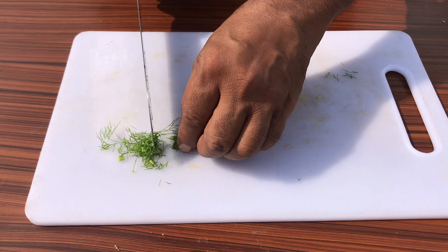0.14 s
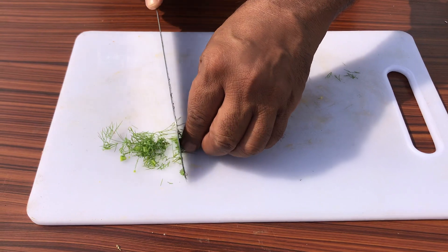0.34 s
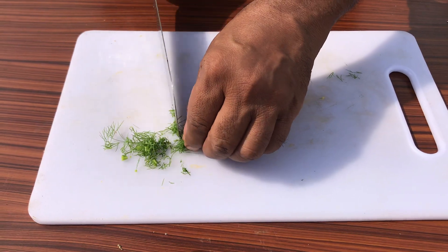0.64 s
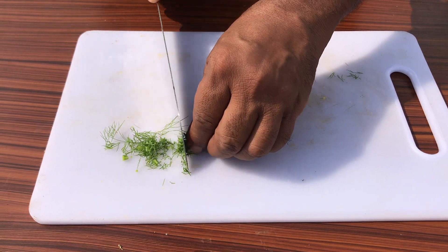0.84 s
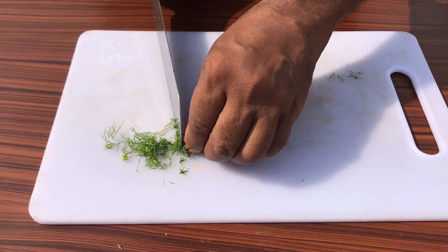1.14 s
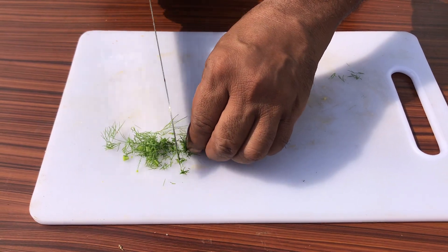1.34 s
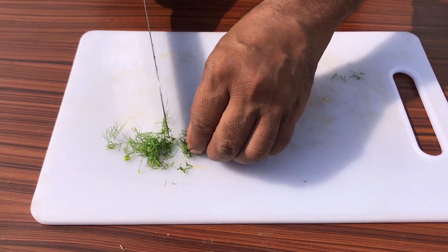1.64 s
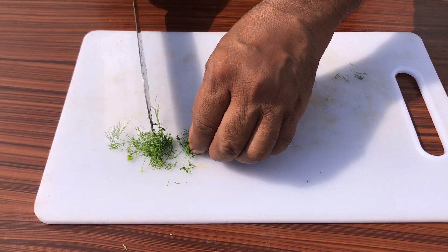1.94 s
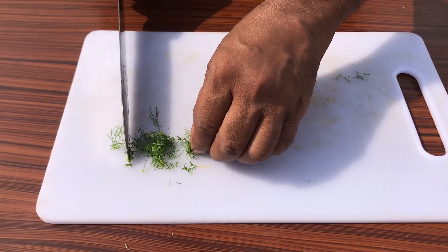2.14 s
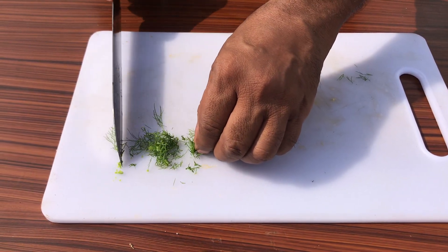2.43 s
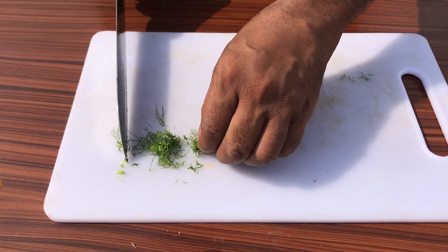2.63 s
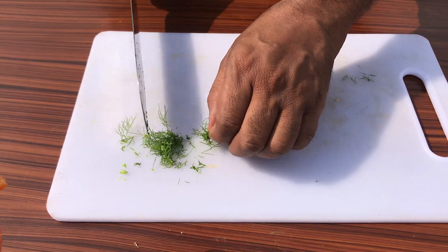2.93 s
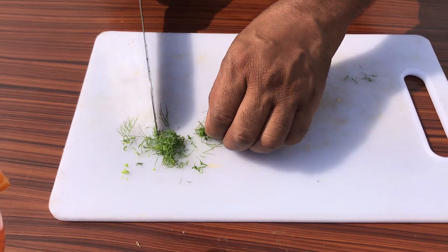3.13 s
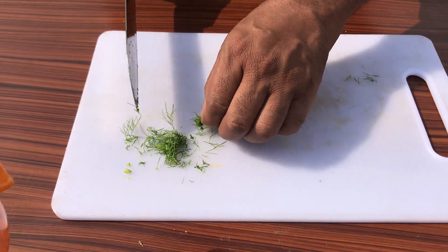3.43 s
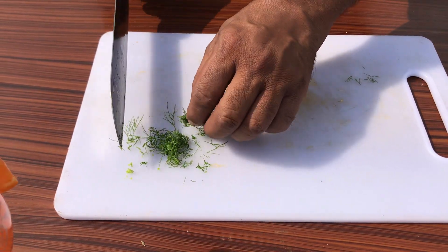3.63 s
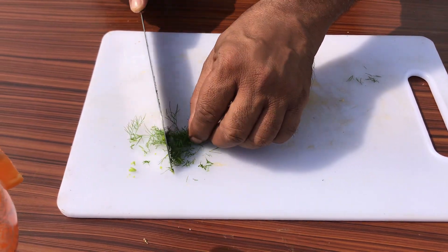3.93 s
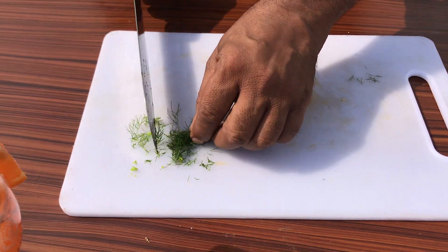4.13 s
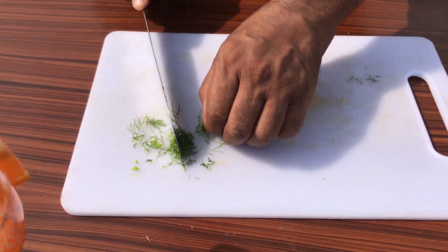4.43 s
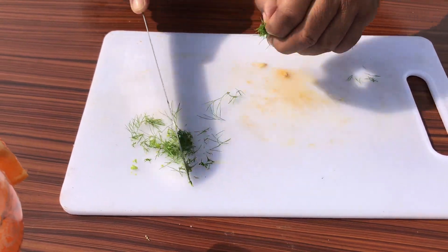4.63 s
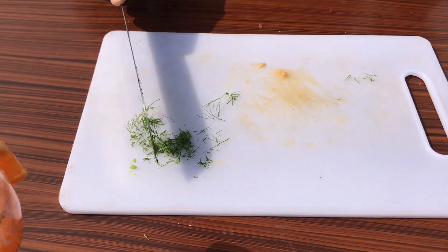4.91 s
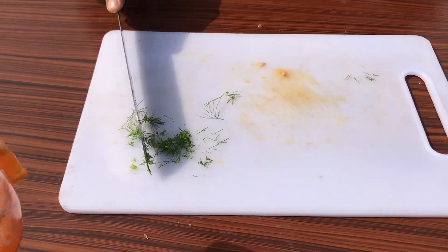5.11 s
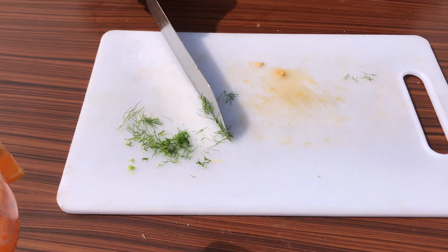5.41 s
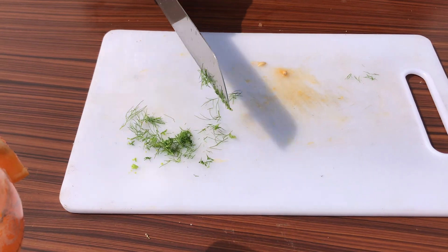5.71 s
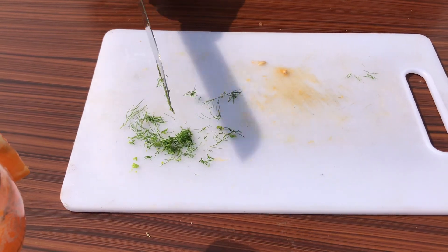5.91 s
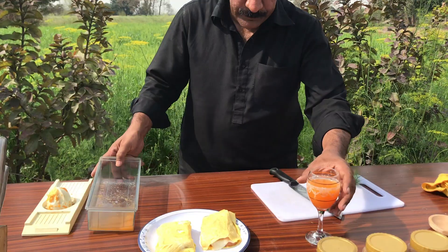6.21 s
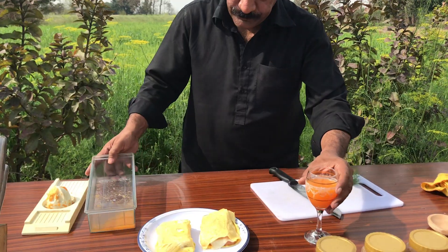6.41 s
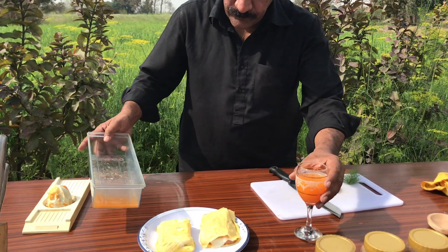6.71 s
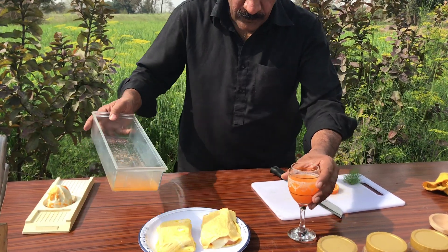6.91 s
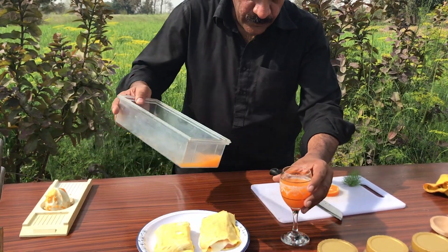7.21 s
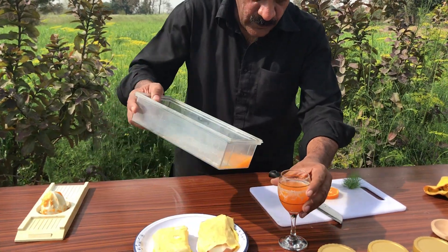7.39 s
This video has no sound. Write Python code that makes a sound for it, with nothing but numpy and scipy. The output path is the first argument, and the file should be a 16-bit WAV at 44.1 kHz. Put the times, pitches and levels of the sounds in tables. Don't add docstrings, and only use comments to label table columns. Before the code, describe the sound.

Close to a phone microphone outdoors, a blade crunches and snaps through herb stems, then lands in sharp irregular cracks on a plastic board, each with a short ring and a woody table thump. Low wind buffets the microphone over rustling crops, a faint far engine and chirping small birds. Near six seconds everything cuts to total silence; quieter open air returns, with thin distant whistles and a double knock of a hollow plastic tub.

```python
import sys
import numpy as np
from scipy import signal
from scipy.fft import rfft, irfft
from scipy.io import wavfile
from scipy.ndimage import uniform_filter1d

SR = 44100
rng = np.random.default_rng(int(sys.argv[2]) if len(sys.argv) > 2 else 0)


def how_loud(loudness_db):
    steps = np.asarray(loudness_db, float) / 20
    return 10 ** steps


def pcm_store(signal):
    levels = np.round(np.clip(np.atleast_2d(signal), -1, 1) * 32767)
    wavfile.write(sys.argv[1], SR, levels.astype(np.int16).T)


N = 332955
T = np.arange(N) / SR

GAP_S, FADE_IN_S = (6.133, 6.806), 0.025
FADE_OUT_S, FADE_OUT_DB = 0.13, -7.5
ONSET_S = 0.001

# [f/Hz, level/dB per Hz]
NEAR_RUSTLE = [(120, -30), (200, 0), (1150, -5), (1490, -1), (2200, -7), (7570, -13), (15600, -19),
               (16900, -47)]
# [f/Hz, level/dB per Hz]
OPEN_AIR = [(76, -33), (130, -8.5), (221, -5), (400, -8), (611, -11), (1600, -9), (11900, -28.5),
            (15600, -27), (16900, -50)]
NEAR_DB, FAR_DB = -64.5, -67
# [f/Hz, level/dB]
MIC_HISS = [(130, -3.5), (500, -4), (2000, -7), (5000, -11.5), (9000, -17.5), (16000, -19.5)]
# [f/Hz, width/Hz, level/dB]
MIC_NOTCH = [(10500, 700, -3.5)]
TOP_HZ = 16600

FIRING_HZ = 38.4
# [multiple, level/dB]
ENGINE_ORDERS = [(1, -20), (2, -1), (3, -15)]
# [t/s, level/dB]
ENGINE_DRIFT = [(0.0, -50.5), (1.43, -58), (1.78, -79), (2.51, -62), (5.03, -54), (7.55, -56)]

# [t after start/s, f/Hz, level/dB]
PHRASE = [(0, 4260, 5), (.028, 5920, 0), (.064, 4900, -1), (.092, 6680, 4)]
# [first t/s, repeats, period/s, level/dB]
BOUTS = [
    (.906, 1, .256, -68),
    (1.434, 4, .253, -66),
    (2.449, 5, .2593, -65),
    (5.312, 4, .2533, -62),
]
TRILL_HZ = 4170
# [first t/s, repeats, period/s, level/dB]
TRILL = [
    (3.775, 1, .13, -62),
    (3.927, 1, .13, -60),
    (4.19, 4, .1355, -67),
    (4.846, 2, .126, -62),
]
# [t/s, f/Hz, level/dB]
STRAY_CHIPS = [(0.358, 5050, -61), (0.42, 4370, -61), (0.496, 6000, -64), (0.93, 5150, -62),
               (1.218, 5150, -64), (1.631, 3100, -63), (1.788, 5170, -64), (1.962, 5170, -63),
               (2.435, 5430, -65), (3.529, 4600, -62), (3.797, 5210, -61), (3.815, 4580, -62),
               (4.83, 6660, -61), (5.21, 6370, -62), (6.12, 5980, -62), (3.515, 4050, -66),
               (3.592, 6720, -64), (3.805, 4000, -66), (4.372, 5050, -64), (.78, 5100, -66),
               (5.672, 6900, -66)]
# [t/s, length/s, start f/Hz, end f/Hz, level/dB]
WHISTLES = [
    (6.815, 0.2, 2870, 2900, -69),
    (6.925, .05, 2500, 1850, -67.5),
    (7.395, 0.089, 3750, 3750, -71.5),
    (7.445, .105, 2780, 1850, -69),
    (2.755, 0.05, 6650, 6650, -63),
    (5.71, .03, 6780, 6700, -65),
    (3.15, .035, 3700, 3700, -60),
]

# [t/s, level/dB]
WIND = [(0.0, -60), (0.92, -56), (1.29, -62), (1.8, -51), (2.22, -56.5), (2.99, -46.5), (4.19, -47.5),
        (4.38, -37.5), (4.8, -51), (5.31, -43.5), (5.85, -50), (6.0, -46.5), (6.95, -56), (7.004, -60.5),
        (7.55, -57)]
# [f/Hz, level/dB per Hz]
BUFFET = [(15, -49), (35, -9.5), (50, -2), (70, -1.5), (100, -9.5), (135, -18.5), (200, -26), (320, -42),
          (500, -61.5)]
# [t/s, peak level/dB, ring f/Hz]
GUSTS = [(0.067, -42.5, 173.5), (1.243, -38.5, 82), (1.88, -33, 84.5), (2.176, -37.5, 74),
         (2.794, -28, 72.4), (3.094, -25.5, 62.3), (3.201, -24, 61.7), (3.296, -41.5, 70.4),
         (3.381, -29, 80.5), (3.449, -39, 99), (3.688, -24, 61.4), (3.737, -33.5, 71), (3.891, -40, 62.5),
         (3.989, -27.5, 52.3), (4.179, -21, 72), (4.36, -51, 74), (4.453, -30.5, 66.7),
         (4.501, -24.5, 59.2), (4.544, -30.5, 72.7), (4.822, -33, 86), (4.908, -27, 69.6),
         (4.968, -31, 59.6), (5.074, -25, 97.7), (5.149, -26, 70), (5.201, -21, 81.8), (5.24, -27.5, 64.4),
         (5.513, -36.5, 58.3), (5.627, -28, 54.7), (5.756, -25, 59.2), (5.999, -41.5, 54)]
GUST_T60_S = 0.22
JOLT_DB, JOLT_PER_FORCE, JOLT_HZ, JOLT_LEAD_S = -25, 0.72, 97, 0.009

# [t/s, peak level/dB, wall pushed in or out]
TUB_KNOCKS = [
    (7.389, -32, 1),
    (7.3998, -33, -1),
]
# [f/Hz, level/dB, t60/s]
TUB_MODES = [(194, -7, 0.09), (260, -1.5, 0.16), (316, 3, 0.13), (424, -7, 0.14), (600, -10, 0.05),
             (1000, -11, 0.03), (1500, -15, 0.018)]

# [t/s, peak level/dB, treble against peak/dB]
SNAPS = [(.0095, -42, 0), (.0175, -42, 2), (.0238, -27, 2), (.029, -42, 0), (.043, -42, -4), (.051, -40, 2),
         (.0822, -27, 6), (.0965, -37, 0), (.102, -42, 2), (.1052, -39, 0), (.1246, -44, 2), (.186, -56, 4),
         (.3348, -50, -2), (.454, -58, 8), (.5438, -52, -8), (.6067, -46, 0), (.5603, -41, -2),
         (.5657, -37, 2), (.5684, -37, 0), (.5707, -36, 2), (.5755, -44, 4), (1.1445, -43, 0),
         (1.154, -44, 2), (1.2015, -45, 2), (1.217, -46, 2), (4.4695, -42, 0), (.6112, -44, 2),
         (.6267, -36, 0), (.6365, -42, 0), (1.0813, -51, 0), (1.0902, -47, 0), (1.1386, -40, 1),
         (1.1905, -43, 2), (1.5668, -48, 0), (1.5723, -40, -5), (1.6222, -45, 0), (1.6582, -48, 0),
         (1.7, -50, -2), (1.928, -47, 0), (1.9604, -42, 0), (1.9898, -52, -4), (2.2363, -44, 0),
         (3.932, -66, 12), (4.0287, -45, 2), (4.0587, -26, -1), (4.0628, -31, 0), (4.0795, -45, -4),
         (4.093, -49, 0), (4.4468, -29, -2), (4.4548, -33, -2), (4.515, -50, 2), (4.5396, -50, 6),
         (4.563, -50, 4), (4.6508, -44, 0), (4.8099, -41, -3), (4.8144, -44, 0), (4.8723, -52, 0),
         (5.7645, -51, -4),
         (5.079, -48, -20), (5.416, -50, -16), (5.428, -50, -16), (5.6775, -47, -12), (5.882, -47, -22),
         (7.389, -55, -4), (2.1803, -35, -1), (2.1826, -37, -1), (2.2895, -50, 5), (5.7685, -50, 0),
         (5.6375, -55, -12), (3.637, -60, -8)]
# [t/s, length/s, level/dB, low scrape against it/dB]
SLIDES = [(-.01, .15, -52, 0), (.05, .05, -60, 11), (.07, .07, -50, -5), (.559, .04, -52, -6),
          (.59, .2, -51.5, -1), (1.06, .09, -60, 5), (1.125, .12, -55, -1), (1.15, .2, -55.5, -3),
          (1.55, .2, -56.5, 0), (1.89, .15, -58, -1), (2.2, .18, -56.5, -8), (4.018, .07, -54, -3),
          (4.04, .08, -53, -4), (4.41, .05, -60, 0), (4.44, .06, -51, -4), (4.47, .12, -60, -2),
          (4.8, .1, -55, -5), (5.762, .02, -56, 4), (5.676, .012, -62, 9), (3.9975, .012, -48, -8),
          (1.872, .014, -52, -4), (4.3975, .012, -50, -6)]
SLIDE_PEAK_SHARE, SLIDE_RISE_DB, SLIDE_FALL_DB = 0.25, 9, 22
# [f/Hz, level/dB per Hz]
CRUNCH = [(1470, -30), (2500, -14), (2930, -2), (5650, -8), (10400, -7.5), (11800, -5), (15600, -13),
          (16900, -59.5)]
# [f/Hz, level/dB per Hz]
SCRAPE = [(300, -2.0), (700, -7.5), (1200, -7.0), (2000, -0.5), (3500, -15.0), (4500, -14.5)]
# [f/Hz, width/Hz, level/dB]
SCRAPE_BUMPS = [(1100.0, 450, 11.0), (3240, 170, 2.0)]

# [t/s, force/dB, bare edge re force/dB, closeness to rim/dB, push into table/dB]
CHOPS = [(1.5372, -20, -12, 4.5, 3.5), (2.5027, -17.5, 12, 11, 5.5), (2.747, -8, 3.5, 1.5, 2.5),
         (2.9639, -23.5, -11, -2.5, -4), (3.1267, -13, 3, 7, 6), (3.3537, -11.5, 2, 4, 3),
         (4.7461, -14, -3.5, -0.5, 1), (5.1007, -10, 8, 2.5, -1.5), (5.4381, -11.5, 10, 4, 0.5),
         (5.7005, -9, 3, 0.5, 0.5), (5.9037, -9.5, 1, 3, -1.5)]
# [main ring f/Hz, edge pressed down/ms, upper ring f/Hz, blade ring/dB, rebound/dB]
LANDINGS = [(1252, 1.7, 1750, 13, -36), (1230, 5.3, 1850, 1, -28.5), (1219, 2, 1720, -1.5, -22),
            (1184, 1.6, 1730, -1, -30), (1150, 1, 1700, 1, -17), (1224, 0.99, 1700, 4.5, -16),
            (1201, 2.2, 1650, 7.5, -30), (1187, 1.6, 1700, -1, -18.5), (1210, 0.92, 1680, -3.5, -11),
            (1310, 3.8, 1620, -3.5, -11), (1236, 1.6, 1703, 4, -28)]
REBOUNDS_MS = [6, 7, 6, 7, 7.5, 9, 6, 4, 5.5, 6.3, 7]
# [t/s, force/dB, edge re force/dB, table push re force/dB]
TOUCHES = [(0.0249, -53, 4, 2.5), (0.079, -56.5, 7, 8), (0.283, -42.5, 2, -6.5), (0.572, -34, 1.5, -9),
           (1.013, -55.5, -3, -1), (1.079, -62.5, -5, 14.5), (1.097, -57.5, -10, 1),
           (1.1132, -52.5, -1, 1.5), (1.876, -42, 4, 9), (2.1776, -53, 20.5, 15), (4.0005, -48.5, -4, 11.5),
           (4.3986, -46.5, 1, 13), (5.576, -48.5, 5, -9)]
# [f/Hz, level/dB, t60/s]
TABLE_MODES = [(157, 0.5, 0.091), (225.6, -5, 0.16), (317, -7, 0.11), (403, -1.5, 0.096), (472, 1.5, 0.066),
               (596, -6.5, 0.1), (680, -9, 0.018), (770, -12.5, 0.011)]
# [f/Hz, level/dB, t60/s]
RING_MODES = [(1230, -0.5, 0.019), (1126, -11.5, 0.041), (1418, -12, .025), (953, -18.5, 0.054),
              (1574, -14.5, 0.015)]
# [f/Hz, level/dB, t60/s]
UPPER_MODES = [(1702, -0.5, 0.018), (1960, -8, 0.015), (2255, -7.5, 0.017), (2790, -6, 0.003)]
# [f/Hz, level/dB, t60/s]
BLADE_MODES = [(3156, -4.5, 0.031), (3490, -5.5, 0.015), (3860, -3.5, 0.01), (4510, -5, 0.017),
               (5160, -5.5, 0.014), (6410, -7, 0.015), (6970, -6.5, 0.012)]
# [f/Hz, level/dB per Hz]
CRACK = [(1470, -34), (2500, -0.5), (4480, 0), (5650, -8.5), (6420, -2.5), (12100, -7.5), (15700, -21.5),
         (16900, -49)]
CHOP_TABLE_DB, CHOP_BOARD_DB, TOUCH_BOARD_DB, BOARD_PER_EDGE = -12.5, -0.5, -3, 0.8
CONTACT_MS, CONTACT_MS_PER_EDGE_DB, TOUCH_CONTACT_MS = 4.2, -0.32, 4.54


def unit(x):
    return x / np.sqrt(np.mean(x ** 2))


def peak1(x):
    return x / np.max(np.abs(x))


def curve_db(rows):
    return np.interp(T, *np.array(rows).T)


def colour(x, points, bumps=()):
    hz = np.maximum(np.arange(len(x) // 2 + 1) * SR / len(x), 1)
    point_hz, point_db = np.array(points).T
    db = np.interp(np.log(hz), np.log(point_hz), point_db, left=-120, right=-120)
    for f, width, top in bumps:
        db = db + top * np.exp(-2 * ((hz - f) / width) ** 2)
    return irfft(rfft(x) * how_loud(db), len(x))


def band(x, lo_hz, hi_hz, order=2):
    return signal.sosfilt(signal.butter(order, [lo_hz, hi_hz], "band", fs=SR, output="sos"), x)


def walk(rate):
    k = int(SR / rate)
    held = np.repeat(rng.standard_normal(N // k + 1), k)
    return 2.2 * uniform_filter1d(uniform_filter1d(held, k), k)[:N]


def add(out, s, x):
    i = int(max(s, 0) * SR)
    out[i:i + len(x)] += x[:N - i]


def ring(modes, t, rise, chance, detune, scatter_db, slip, hold=0):
    out = 0
    for (hz, db, t60), (a, b, c) in zip(modes, chance):
        decay = np.exp(-np.log(1000) * np.maximum(t - rise - hold, 0) / t60)
        swell = np.minimum(t / rise, 1) ** 0.54 * decay
        tone = np.sin(2 * np.pi * hz * (1 + detune * b) * t + slip * c)
        out = out + how_loud(db + scatter_db * a) * swell * tone
    return peak1(out)


def field():
    near = colour(rng.standard_normal(N), NEAR_RUSTLE)
    far = colour(rng.standard_normal(N), OPEN_AIR)
    near = how_loud(NEAR_DB) * near / np.std(band(near, 600, 4800))
    far = how_loud(FAR_DB) * far / np.std(band(far, 600, 4800))
    rustle = np.where(T < GAP_S[1], near, far)
    out, sway = 0, walk(0.42)
    for hz in 130 * 2 ** np.arange(0, 7, 0.5):
        flicker = how_loud(0.7 * sway + 1.8 * walk(14))
        out = out + flicker * band(rustle, hz, min(hz * 2 ** 0.5, 0.45 * SR), order=3)
    return out + how_loud(-70) * unit(colour(rng.standard_normal(N), MIC_HISS))


def engine():
    phase = 2 * np.pi * np.cumsum(FIRING_HZ * (1 + 0.0044 * walk(0.94))) / SR
    hum = sum(how_loud(db + 1.5 * walk(10)) * np.sin(k * phase) for k, db in ENGINE_ORDERS)
    return how_loud(curve_db(ENGINE_DRIFT)) * hum


def repeated(bouts):
    return [(s + k * period, db) for s, count, period, db in bouts for k in range(int(count))]


def chips():
    notes = [(s + late, hz, db + rel, 1.2) for s, db in repeated(BOUTS) for late, hz, rel in PHRASE]
    notes += [(s, TRILL_HZ, db, 4.5) for s, db in repeated(TRILL)]
    return notes + [(s, hz, db, 1.3) for s, hz, db in STRAY_CHIPS]


def birds():
    out, t = np.zeros(N), np.arange(-0.012, 0.012, 1 / SR)
    for s, hz, db, fall in chips():
        scatter = rng.standard_normal()
        bent_time = t - fall * (1 + 0.6 * scatter) * t ** 2
        tone = np.sin(2 * np.pi * hz * (1 + 0.005 * scatter) * bent_time)
        chip = how_loud(db + 1 + 1.2 * scatter) * np.exp(-(t / 0.0034) ** 2) * tone
        add(out, s - 0.012, chip)
        add(out, s + 0.002, how_loud(-12) * chip)
    for s, length, start_hz, end_hz, db in WHISTLES:
        part = np.arange(int(length * SR)) / (length * SR)
        hz = start_hz + (end_hz - start_hz) * part ** 3 + 20 * walk(40)[:len(part)]
        breath = np.sin(np.pi * part) ** 0.4 * how_loud(2 * walk(60)[:len(part)] - 2)
        add(out, s, how_loud(db) * breath * np.sin(2 * np.pi * np.cumsum(hz) / SR))
    return out


def wind():
    strength = how_loud(curve_db(WIND) - 0.5 + 4.5 * walk(14))
    out = strength * unit(colour(rng.standard_normal(N), BUFFET))
    t = np.arange(int(0.3 * SR)) / SR
    jolts = [(s - JOLT_LEAD_S, JOLT_DB + JOLT_PER_FORCE * db, JOLT_HZ) for s, db, *_ in CHOPS]
    for s, db, hz in GUSTS + jolts:
        phase = 2 * np.pi * hz * (t + 0.0034 * (1 - np.exp(-t / 0.0041)))
        swell = np.minimum(t / 0.0059, 1) * np.exp(-np.log(1000) * t / GUST_T60_S)
        overtone = 0.31 * np.exp(-t / 0.039) * np.cos(2 * phase)
        add(out, s + 0.0024, how_loud(db - 1.0) * swell * (np.sin(phase) + overtone))
    return out


def tub():
    out, t = np.zeros(N), np.arange(int(0.2 * SR)) / SR
    for s, db, side in TUB_KNOCKS:
        chance = rng.standard_normal((len(TUB_MODES), 3))
        boom = ring(TUB_MODES, t, 0.0008, chance, detune=0.02, scatter_db=2.0, slip=0.35)
        add(out, s, side * how_loud(db) * boom)
    return out


def slides():
    crunch, scrape = np.zeros(N), np.zeros(N)
    for s, length, db, low_db in SLIDES:
        times = s + length * np.array([0, SLIDE_PEAK_SHARE, 1])
        shape = np.interp(T, times, [-SLIDE_RISE_DB, 0, -SLIDE_FALL_DB], left=-60, right=-60)
        crunch = np.maximum(crunch, how_loud(db + shape))
        scrape = np.maximum(scrape, how_loud(db + low_db + shape))
    return uniform_filter1d(crunch, size=250), uniform_filter1d(scrape, size=250)


def leaves():
    crunch_gain, scrape_gain = slides()
    grains = rng.standard_normal(N)
    grains = grains * how_loud(np.minimum(2.8 * rng.exponential(size=N), 14))
    grains = grains * how_loud(2.2 * walk(300))
    crunch = unit(colour(grains, CRUNCH))
    scrape = unit(colour(grains[::-1], SCRAPE, SCRAPE_BUMPS))
    out = how_loud(3.5) * crunch_gain * crunch + how_loud(5.5) * scrape_gain * scrape
    t = np.arange(int(0.011 * SR)) / SR
    for s, db, treble_db in SNAPS:
        burst = rng.standard_normal(len(t)) * np.exp(-t / 0.0013)
        burst[0] = -3.5
        mid, top = band(burst, 2200, 8000), band(burst, 6000, 15500)
        add(out, s + ONSET_S, how_loud(db) * (peak1(mid) + how_loud(treble_db) * peak1(top)))
    return out


def strokes():
    every = []
    for (s, db, edge, rim, push), rebound_ms, landing in zip(CHOPS, REBOUNDS_MS, LANDINGS):
        contact_ms = CONTACT_MS + CONTACT_MS_PER_EDGE_DB * edge
        every.append((s, db + edge, db, db + CHOP_TABLE_DB + push, db + CHOP_BOARD_DB + rim,
                      contact_ms, rebound_ms, landing))
    cushioned = (RING_MODES[0][0], 0, UPPER_MODES[0][0], 0, -40)
    for s, db, edge, push in TOUCHES:
        board_db = db + TOUCH_BOARD_DB + BOARD_PER_EDGE * edge
        every.append((s, db + edge, db, db + push, board_db, TOUCH_CONTACT_MS, 5, cushioned))
    return sorted(every)


def edge_crack(t, contact, hiss):
    chatter = np.exp(-t / 0.0049) / (1 + np.exp((t - 1.2 * contact) / 0.00091))
    chatter = chatter + how_loud(-19.0) * np.exp(-t / 0.0038)
    crack = np.minimum(t / 0.0001, 1) ** 2 * chatter * unit(colour(hiss, CRACK))
    return peak1(crack - 2.7 * np.exp(-((t - 0.0003) / 0.00004) ** 2))


def noisy_tail(hiss, lo_hz, hi_hz, t, rise_s, decay_s):
    return unit(band(hiss, lo_hz, hi_hz)) * np.minimum(t / rise_s, 1) * np.exp(-t / decay_s)


def chops():
    out, t = np.zeros(N), np.arange(int(0.25 * SR)) / SR
    late = np.maximum(t - 0.00033, 0)
    for s, crack_db, ring_db, table_db, board_db, contact_ms, rebound_ms, landing in strokes():
        ring_hz, hold_ms, upper_hz, blade_db, rebound_db = landing
        chance, hiss = rng.standard_normal((4, 10, 3)), rng.standard_normal((3, len(t)))
        contact, hold = np.clip(contact_ms, 1, 9) / 1000, max(hold_ms, 0) / 1000
        upper_modes = [(upper_hz, *UPPER_MODES[0][1:])] + UPPER_MODES[1:]
        main_modes = [(ring_hz, *RING_MODES[0][1:])] + RING_MODES[1:]

        upper = ring(upper_modes, late, 0.1 * contact, chance[1],
                     detune=0.008, scatter_db=3.0, slip=0.62, hold=0.33 * hold)
        blade = ring(BLADE_MODES, late, 0.24 * contact, chance[3], detune=0.015, scatter_db=1.5, slip=1.0)
        stroke = how_loud(crack_db + 2.0) * edge_crack(t, contact, hiss[0])
        stroke += how_loud(board_db + 2.5) * upper
        stroke += how_loud(crack_db + blade_db - 7.0) * blade
        add(out, s + ONSET_S + rebound_ms / 1000, how_loud(rebound_db) * stroke)

        main = ring(main_modes, late, 0.35 * contact, chance[0],
                    detune=0.0068, scatter_db=1.5, slip=0.38, hold=hold)
        thump = ring(TABLE_MODES, late, 0.54 * contact, chance[2], detune=0.06, scatter_db=-1.0, slip=2.14)
        stroke += how_loud(ring_db + 5.0) * main
        stroke += how_loud(table_db + 5.5) * thump
        stroke += how_loud(board_db - 11.5) * noisy_tail(hiss[1], 700, 2100, t, 0.0018, 0.0055)
        stroke += how_loud(ring_db - 43) * noisy_tail(hiss[1], 1250, 1750, t, 0.0059, 0.04)
        stroke += how_loud(table_db - 9.5) * noisy_tail(hiss[2], 200, 600, t, 0.0066, 0.017)
        add(out, s + ONSET_S, stroke)

        swell = (t < 0.011) * np.sin(np.pi * t / 0.011) ** 2
        crush = unit(band(hiss[0, ::-1], 950, 1600)) * swell
        add(out, s - 0.013, how_loud(ring_db - 35.5) * crush)
    return out


def scene():
    return (chops() + leaves() + tub() + wind() + engine() + field() + birds())[None]


def roll_off(x):
    return signal.sosfilt(signal.butter(12, 17030, fs=SR, output="sos"), x)


def record(dry):
    x = signal.sosfilt(signal.butter(2, 35, "high", fs=SR, output="sos"), dry)
    x = colour(x[0], [(1, 0), (SR, 0)], MIC_NOTCH)[None]
    x = 1.25 * np.tanh(x)
    x = signal.sosfilt(signal.ellip(10, 0.2, 90, TOP_HZ, fs=SR, output="sos"), x)
    dip = how_loud(FADE_OUT_DB * np.clip(1 - (GAP_S[0] - T) / FADE_OUT_S, 0, 1))
    fade_in = np.clip((T - GAP_S[1]) / FADE_IN_S, 0, 1)
    return roll_off(x * np.where(T < GAP_S[0], dip, fade_in))


dry = scene()
out = record(dry)
pcm_store(out)
```